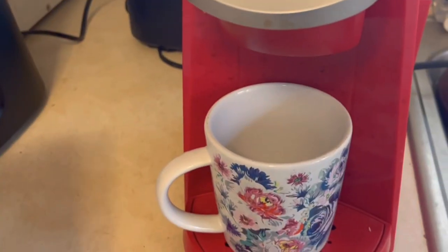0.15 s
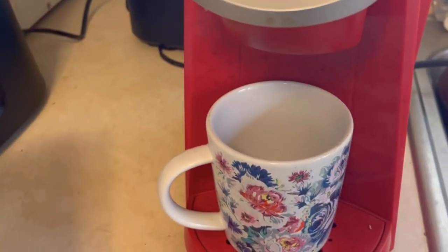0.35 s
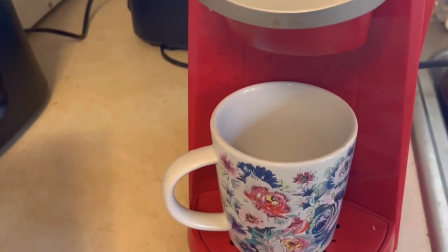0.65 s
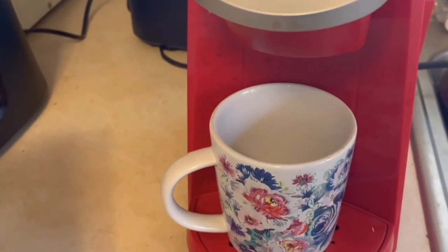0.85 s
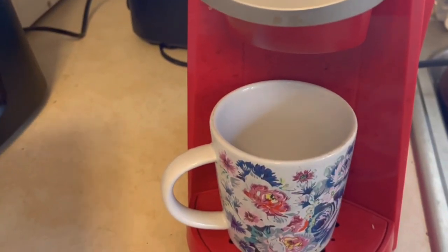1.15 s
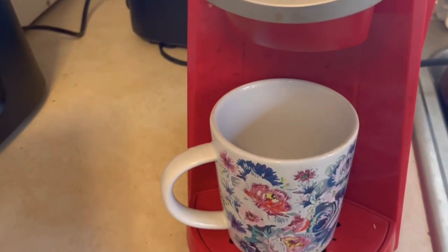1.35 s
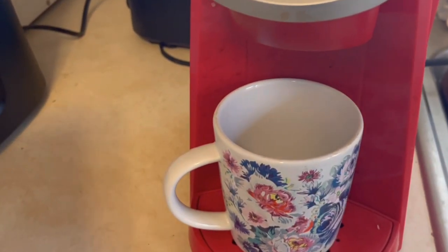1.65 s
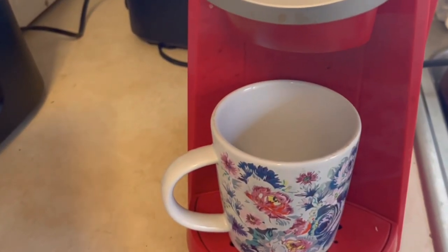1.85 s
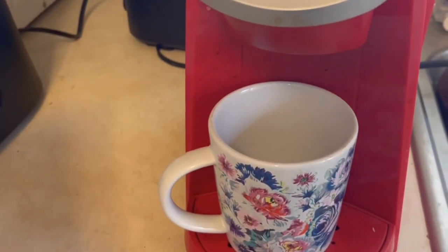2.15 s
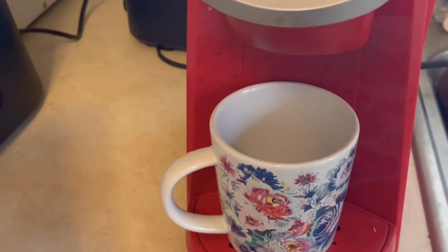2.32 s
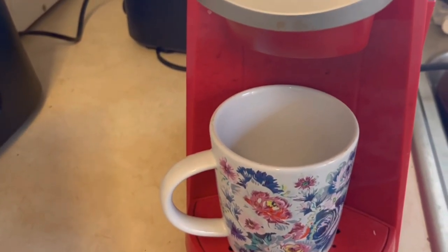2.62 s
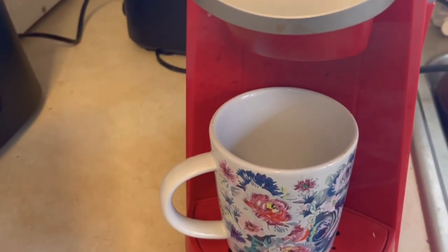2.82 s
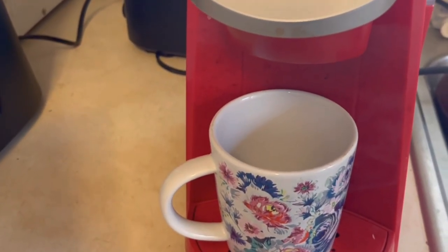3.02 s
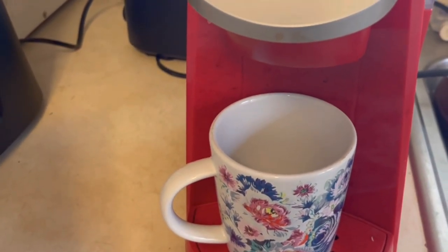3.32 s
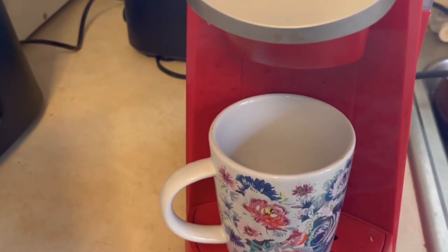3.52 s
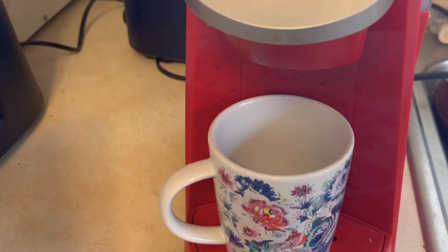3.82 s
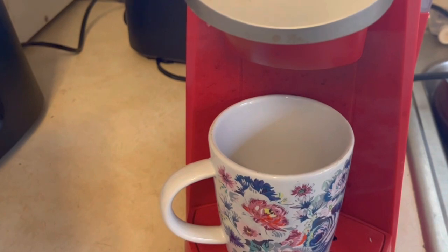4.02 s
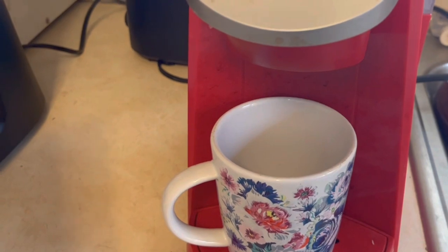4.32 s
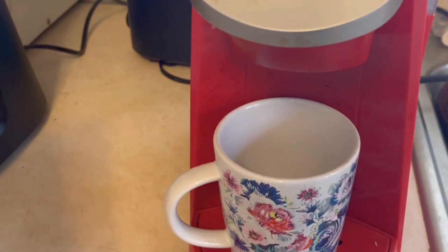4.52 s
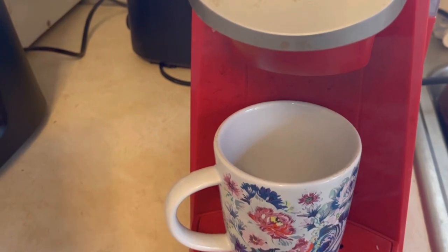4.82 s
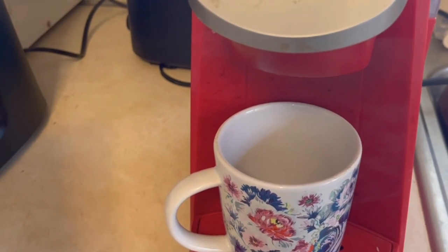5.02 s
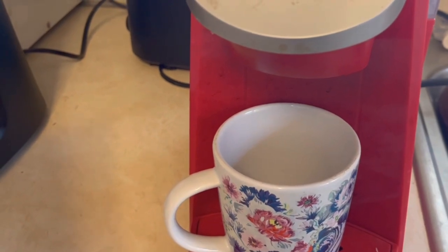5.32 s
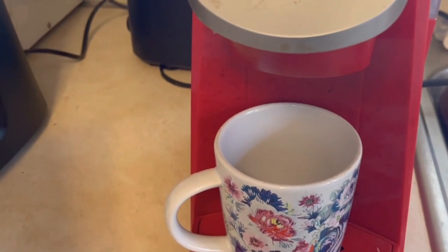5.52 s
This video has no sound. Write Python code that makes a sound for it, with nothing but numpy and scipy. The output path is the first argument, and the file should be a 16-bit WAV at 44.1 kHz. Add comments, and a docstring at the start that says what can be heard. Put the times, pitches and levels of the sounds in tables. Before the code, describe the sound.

A small coffee machine pump cycles slowly on a kitchen counter, each stroke a soft plastic rub, a tick, then a quick knock-and-snap.

```python
"""A low rumble, a faint rush and the rub of a stroke already under way are heard first.
The pump of a single-cup coffee machine cycles on a kitchen counter, a stroke about every 1.16 s:
the drive rubs in its plastic housing, a valve ticks open, the drive knocks at its stop, the valve snaps shut.
Contacts are sums of damped modes with noise bursts; rubbing and hisses are shaped noise.
Soft hisses and faint taps come between, and a small kitchen rings briefly as decaying diffuse noise."""
import sys
import numpy as np
from scipy import signal
from scipy.fft import rfft, irfft, next_fast_len
from scipy.io import wavfile
from scipy.ndimage import map_coordinates

SR = 44100
rng = np.random.default_rng(int(sys.argv[2]) if len(sys.argv) > 2 else 0)


def wav_out(sig):
    """Save sig, one row per channel (or a flat mono array), as 16-bit PCM at SR to the path in sys.argv[1]."""
    wavfile.write(sys.argv[1], SR, np.round(np.clip(np.atleast_2d(sig).T, -1, 1) * 32767).astype(np.int16))


N = 250047
TIME = np.arange(N) / SR
RING_TIME = np.arange(SR // 3) / SR

# Event levels are nominal: each component has its own trim.
# pump strokes: start_s (drive engages), contact_level_db, housing_shake_db, friction_db
STROKES = [(-0.035, -46, -57.5, -58), (1.1144, -48, -57.5, -59), (2.2653, -48.5, -59.5, -60),
           (3.4332, -48, -59.5, -61.5), (4.6066, -52.5, -60.5, -61.5)]
# the valve opens: start_s, level_db
OPENS = [(0.1397, -33.5), (1.289, -33.5), (2.445, -33), (3.6144, -32.5), (4.7933, -33)]
# the drive reaches its stop: start_s, level_db
KNOCKS = [(0.4226, -28), (1.5768, -28.5), (2.7372, -28.5), (3.9112, -28), (5.0921, -28)]
# the valve snaps shut: start_s, level_db
SNAPS = [(0.4631, -27.5), (1.6191, -27.5), (2.7812, -27), (3.954, -27), (5.1393, -28)]
# the drive catches lightly on its way: start_s, level_db, scuff_pitch_hz
CATCHES = [(0.2115, -37, 1160), (0.265, -40, 1240), (0.291, -38.5, 990), (1.3835, -38, 1150),
           (1.404, -41, 1240), (2.553, -44, 1300), (3.7215, -38, 1580), (4.9, -43, 1400)]
# soft hisses: centre_s, half_length_s (to 1/e), level_db
HISSES = [(0.299, 0.0083, -51), (0.331, 0.026, -51.5), (1.825, 0.087, -64.5), (1.939, 0.064, -61.5)]
# faint taps: start_s, pitch_hz, level_db, t60_s
TAPS = [(0.777, 70.4, -49, 0.13), (1.914, 280, -52.5, 0.11), (5.334, 1190, -54, 0.037),
        (5.398, 365, -41.5, 0.015)]

# modes of each contact, before damping and small random shifts: pitch_hz, base_width_hz, relative_db
START_MODES = [(1110, 140, -16), (1674, 66, 2), (2150, 40, 2.5), (2800, 180, -5), (3230, 79, -1.5)]
CATCH_MODES = [(901, 63, -6), (1135, 37, 3.5), (1297, 64, -0.5), (1533, 50, 1), (1723, 61, -2),
               (1980, 62, -11), (2330, 180, -25), (2880, 130, -12)]
OPEN_MODES = [(676, 9.7, -5), (1113, 22, -5), (1586, 21, 0), (1984, 65, -11), (2336, 19, -12),
              (2640, 38, -13), (3010, 25, -14), (3106, 130, -12.5), (3465, 26, -11.5), (3800, 50, -19),
              (3680, 6.7, -19.5), (4010, 94, -6.5)]
KNOCK_MODES = [(502, 44, -2), (1152, 42, -1.5), (1368, 30, -5.5), (2130, 70, -5.5), (2210, 18, -15),
               (2460, 50, -17.5), (2780, 19, -17), (2974, 25, -17), (3230, 110, -18), (4000, 25, -19.5),
               (5300, 16, -23.5)]
SNAP_MODES = [(1107, 17, -23), (1340, 11, -7.5), (1567, 24, -6), (1688, 22, -6.5), (2256, 39, 2),
              (2563, 15, -5), (2750, 22, -9), (2926, 160, -15), (4116, 70, -5), (4100, 170, -15.5),
              (5120, 35, -19)]
# noise-driven resonances of the housing and the drive: centre_hz, half_width_hz, relative_db
HOUSING = [(148, 53, -5.5), (194, 15, -0.5), (239.4, 13.3, 1.5), (302.6, 27, 3.5), (361, 11, -6.5),
           (436.3, 17.5, 1.5), (499, 27, -3), (559.4, 21.7, -1.5), (703.5, 27, -9)]
DRIVE = [(1146, 18, 7.5), (1487, 16, 3.5), (2150, 48, -21)]

# noise spectra of cracks, scraping, hisses, rumble and rush: frequency_hz, relative_db (density)
CRACK = [(240, -40), (400, -4), (886, -4.5), (1590, 7.5), (1990, -22), (2290, -33), (2510, -9), (3510, -11),
         (4090, -12), (4630, -17), (5910, -24.5), (10900, -28), (15500, -60)]
SCRAPE = [(300, -31), (500, -17.5), (650, -8), (980, -9.5), (1500, -4.5), (1850, -12), (2400, -12),
          (3000, -21), (4100, -24.5), (5000, -23), (6500, -30), (9600, -26.5), (11200, -28), (12500, -51),
          (15500, -31.5)]
HISS = [(150, -24), (400, 5.5), (1500, -0.5), (3200, -0.5), (4600, -5.5), (6500, -8), (9500, -11),
        (11500, -13), (13000, -27), (15500, -20)]
RUMBLE = [(12, -72), (20, -8.5), (70, 0), (117, -5.5), (170, -15.5), (235, -17), (265, -22.5), (304, -19),
          (348, -33), (500, -27), (650, -69.5), (1100, -120)]
RUSH = [(200, -10.5), (450, -6.5), (800, -7.5), (1150, -4.5), (1450, 2.5), (1700, 4), (1800, -12.5),
        (2400, -12.5), (3200, -19), (5500, -18.5), (6600, -27.5), (8300, -19), (11000, -34), (12500, -45)]

# left-right correlation of noise: frequency_hz, correlation (unitless)
ALIKE = [(60, 0.96), (250, 0.92), (500, 0.86), (1000, 0.22), (2000, 0.54), (4000, 0.33), (9000, 0.73)]
# reverberation time of the kitchen: frequency_hz, t60_s
KITCHEN = [(150, 0.67), (500, 0.51), (1400, 0.56), (2500, 0.52), (4000, 0.57), (10000, 0.29)]
# sound radiated towards the walls: frequency_hz, gain_db
WALLS = [(200, 0), (2600, 0), (3600, -1), (4100, -10), (4700, -4), (9000, -3)]
# stereo balance of the machine before the counter's ripple: frequency_hz, left_minus_right_db
LEAN = [(60, 0.3), (380, 0), (750, -2), (1600, -1.3), (2800, 1.3), (3600, 1.3), (4170, -3.5), (4900, 1),
        (8000, -0.3)]
# phase from the spacing of the microphones: frequency_hz, left_lead_rad
LEAD = [(400, -0.1), (1120, 0.4), (1450, -0.7), (4400, 0.5), (7000, -4.6), (8300, -6.2), (10200, -6.4),
        (15000, -12.6)]

# rubbing fades in as the drive engages, holds until the valve shuts, then dies away
RUN_UP_S, RUN_DOWN_S = 0.019, 0.051
# the effort jumps as the valve opens, then eases
LOAD_DB, EASE_S = 5, 0.15
# the effort swells again around the stop
STRAIN_DB, STRAIN_S = 4, 0.064
# dB that each part of the rubbing gains per dB of effort
HOUSING_GROWS, RATTLE_GROWS, SCRAPE_GROWS = 0.92, 1.15, 0.45
# the drive drags, then binds with a groan: seconds before the knock, dB against the knock
DRAG_S, DRAG_DB = 0.08, -21
BIND_S, BIND_DB = 0.037, -17
GROAN_DB, GROAN_DB_PER_STROKE = -19, 1.56  # the rise per stroke applies to binding and groan
# the valve rebounds once after opening: delay and trim
REBOUND_S, REBOUND_DB = 0.0067, -4.5
# a reflection off the counter ripples the stereo balance in the midrange
ECHO_S, RIPPLE_DB, RIPPLE_HZ, RIPPLE_WIDTH_HZ = 0.00146, 3, 1900, 1400
TOP_HZ = 15700


def amp(db):
    """Amplitude gain is ten to the power of decibels over twenty."""
    return 10 ** (np.asarray(db) / 20)


def unit(x):
    """Normalization divides a signal by its root mean square."""
    return x / np.sqrt(np.mean(x ** 2) + 1e-20)


def along(points, hz):
    """Interpolation on a logarithmic frequency axis joins tabulated values."""
    f, v = np.transpose(points)
    return np.interp(np.log(hz + 1), np.log(f + 1), v)


def wobble(rate):
    """Slow random modulation is a smooth curve through random knots, rate of them a second."""
    knots = rng.standard_normal(int(N * rate / SR) + 4)
    return map_coordinates(knots, [TIME * rate])


def filtered(x, response):
    """Linear filtering multiplies the spectrum by a frequency response."""
    n = x.shape[-1]
    m = next_fast_len(n + SR // 5)  # zero padding leaves room for filter tails
    hz = np.fft.rfftfreq(m, 1 / SR)
    return irfft(rfft(x, m) * response(hz), m)[..., :n]


def colour(points):
    """Spectral colouring follows a tabulated level curve."""
    return lambda hz: amp(along(points, hz))


def resonances(modes):
    """Independent resonances add in power; each has a Lorentzian amplitude."""
    def response(hz):
        peaks = [amp(db) / (1 + ((hz - centre) / width) ** 2) for centre, width, db in modes]
        return np.sqrt(sum(peak ** 2 for peak in peaks))
    return response


def noise(response, size):
    """Mixing independent mid and side noise sets the left-right correlation at each frequency."""
    def mid_side(hz):
        turn = np.arccos(np.clip(along(ALIKE, hz), -1, 1)) / 2
        return response(hz) * np.array([np.cos(turn), np.sin(turn)])
    mid, side = filtered(rng.standard_normal((2, size)), mid_side)
    return unit(np.array([mid + side, mid - side]))


def add(track, s, sound):
    """Superposition adds a sound at time s, trimmed to the track."""
    start = round(s * SR)
    track[:, max(start, 0):start + sound.shape[1]] += sound[:, max(-start, 0):N - start]


def fade(attack, t60):
    """A struck part's envelope rises quickly and decays exponentially."""
    return (1 - np.exp(-RING_TIME / attack)) * amp(-60 * RING_TIME / t60)


def contacts(events, modes, loss_hz, attack, crack_db, crack_t60, thump_db, thump_t60):
    """Impact excites damped modes, a broadband crack and a thump of the housing."""
    track = np.zeros((2, N))
    hz, width, db = np.transpose(modes)[:, :, None]
    width = np.maximum(width + loss_hz, 48)
    polarity = (-1) ** np.arange(len(modes))[:, None]  # neighbouring modes swing opposite ways
    # the factor of width holds each mode's spectral peak steady as damping changes
    decay = polarity * width * np.exp(-np.pi * width * RING_TIME) * (1 - np.exp(-RING_TIME / attack))
    # each mode has one left-right phase offset, the same for every event
    lead = rng.uniform(-0.39, 0.53, hz.shape)
    phase = np.array([lead, -lead])
    for s, level_db, *_ in events:
        strength = amp(db + rng.normal(0, 1, hz.shape))
        pitch = hz * (1 + rng.normal(0, 0.002, hz.shape))
        swing = np.sin(2 * np.pi * pitch * RING_TIME + phase)
        ring = np.sum(strength * decay * swing, axis=1)
        ring /= np.sqrt(np.mean(ring[:, :SR // 100] ** 2))  # rms 1 over the first 10 ms
        crack = amp(crack_db) * fade(attack, crack_t60) * noise(colour(CRACK), len(RING_TIME))
        thump = amp(thump_db) * fade(0.0074, thump_t60) * noise(resonances(HOUSING), len(RING_TIME))
        add(track, s, amp(level_db) * (ring + crack + thump))
    return track


def chatter(events, delay, db, attack, t60, modes):
    """Irregular contact is narrowband noise with a rough, decaying envelope."""
    track = np.zeros((2, N))
    for s, level_db in events:
        burst = fade(attack, t60) * noise(resonances(modes), len(RING_TIME))
        add(track, s + delay, amp(level_db + db) * burst)
    return track * unit(amp(1.5 * wobble(160)))


def background():
    """Filtered noise gives a wavering low rumble and a faint, nearly steady rush."""
    def low_band(hz):
        return colour(RUMBLE)(hz) * hz ** 4 / (hz ** 4 + 40 ** 4)
    rumble = amp(-65.0 + 1.66 * wobble(9)) * noise(low_band, N)
    rush = amp(-71.5 + 0.49 * wobble(5.7)) * noise(colour(RUSH), N)
    return rumble + rush


def drive_motion():
    """Load governs friction: returns shake and friction gains and effort in dB at each sample."""
    shake, friction, effort_db = np.zeros((3, N))
    for stroke, (opens, _), (stops, _), (shuts, _) in zip(STROKES, OPENS, KNOCKS, SNAPS):
        start, _, housing_db, friction_db = stroke
        run_up = np.maximum(start - TIME, 0) / RUN_UP_S
        run_down = np.maximum(TIME - shuts, 0) / RUN_DOWN_S
        moving = np.exp(-run_up - run_down)
        shake += moving * amp(housing_db)
        friction += moving * amp(friction_db)
        effort_db += LOAD_DB * (TIME > opens) * np.exp(-np.abs(TIME - opens) / EASE_S)
        effort_db += STRAIN_DB * np.exp(-((TIME - stops) / STRAIN_S) ** 2)
    return shake, friction, effort_db


def slips(rate, spread_db, t60):
    """Stick-slip releases energy in many small decaying events of random time and size."""
    chance, size = rng.random(N), rng.standard_normal(N)
    blows = (chance < rate / SR) * amp(spread_db * np.clip(size, -2, 2))
    power = signal.fftconvolve(blows ** 2, fade(0.00028, t60) ** 2)[:N]
    return unit(np.sqrt(np.abs(power)))


def rubbing():
    """Stick-slip friction shakes the housing and counter and rings the drive."""
    shake, friction, effort_db = drive_motion()
    housing = amp(0.5) * noise(resonances(HOUSING), N)
    counter = amp(-5.5) * noise(resonances([(64.8, 13, 1), (108.0, 15, -5.5)]), N)
    unevenness = unit(amp(1.4 * wobble(21) + 2.05 * wobble(130)))
    scrape = amp(-2.0) * unevenness * noise(colour(SCRAPE), N)
    rattle_noise = noise(resonances(DRIVE + [(810, 126, -6.5)]), N)
    rattle = amp(-3.5) * slips(rate=100, spread_db=3.5, t60=0.053) * rattle_noise
    grit_noise = noise(resonances([(1940, 570, 0.0), (2770, 590, -4.5), (4070, 560, -10.5)]), N)
    grit = amp(-6.5) * slips(rate=160, spread_db=2.0, t60=0.023) * grit_noise
    body = amp(HOUSING_GROWS * effort_db) * housing + counter
    surface = amp(RATTLE_GROWS * effort_db) * rattle + amp(SCRAPE_GROWS * effort_db) * (scrape + grit)
    return shake * body + friction * surface


def drive_contacts():
    """Impacts and friction ring the drive as it engages, catches, drags, binds and hits its stop."""
    start = amp(-8.5) * contacts(STROKES, START_MODES, loss_hz=9, attack=0.001,
                                 crack_db=2.0, crack_t60=0.11, thump_db=6, thump_t60=0.15)
    catches = amp(-11.5) * contacts(CATCHES, CATCH_MODES, loss_hz=-16, attack=0.001,
                                    crack_db=-2, crack_t60=0.1, thump_db=0, thump_t60=0.09)
    for s, level_db, hz in CATCHES:  # each catch scuffs at its own pitch
        scuff = fade(0.0018, 0.057) * noise(resonances([(hz, 130, 0)]), len(RING_TIME))
        add(catches, s, amp(level_db - 4.5) * scuff)
    drag = chatter(KNOCKS, delay=-DRAG_S, db=DRAG_DB, attack=0.02, t60=0.24,
                   modes=[(1160, 38, 2), (1500, 120, -10)])
    building = [(s, level_db + GROAN_DB_PER_STROKE * k) for k, (s, level_db) in enumerate(KNOCKS)]
    bind = chatter(building, delay=-BIND_S, db=BIND_DB, attack=0.0018, t60=0.057,
                   modes=[(515, 90, -4), (1166, 63, 0.5), (1530, 130, -0.5), (2400, 500, -17)])
    groan = chatter(building, delay=-BIND_S, db=GROAN_DB, attack=0.0046, t60=0.21,
                    modes=[(155, 18, -3), (197, 20, 0), (245, 17, -0.5), (305, 24, 0), (470, 60, -4)])
    knock = amp(-14) * contacts(KNOCKS, KNOCK_MODES, loss_hz=1.5, attack=0.00084,
                                crack_db=-1.5, crack_t60=0.07, thump_db=3.5, thump_t60=0.12)
    rattle = chatter(KNOCKS, delay=0.00701, db=-7, attack=0.00038, t60=0.034,
                     modes=[(510, 120, -1.6), (1130, 61, -1.1), (1460, 390, -1.1)])
    return start + catches + drag + bind + groan + knock + rattle


def valve_opening():
    """Release of a seated valve gives a creak, an unsticking, a modal tick and a rebound."""
    creak = chatter(OPENS, delay=-0.032, db=-21, attack=0.0022, t60=0.07,
                    modes=[(1200, 200, 1), (2360, 400, -6)])
    unstick = chatter(OPENS, delay=-0.0075, db=-6.5, attack=0.00078, t60=0.057,
                      modes=[(1360, 610, 16), (3220, 230, -13)])
    tick = amp(-6.5) * contacts(OPENS, OPEN_MODES, loss_hz=7.3, attack=0.0012,
                                crack_db=-2.5, crack_t60=0.083, thump_db=-1.5, thump_t60=0.18)
    rebound = chatter(OPENS, delay=REBOUND_S, db=REBOUND_DB, attack=0.00049, t60=0.023,
                      modes=[(1420, 410, -1.5), (3200, 420, -6.5), (4120, 160, -1)])
    return creak + unstick + tick + rebound


def hisses():
    """Broadband noise swells in Gaussian envelopes with slight crackle."""
    level = sum(amp(db) * np.exp(-((TIME - s) / half) ** 2) for s, half, db in HISSES)
    crackle = unit(amp(1.5 * wobble(300) + 1.2 * wobble(40)))
    return level * crackle * noise(colour(HISS), N)


def valve_closing():
    """Impact on the valve seat gives a brush, a modal snap, a crunch and a brief buzz."""
    brush = chatter(SNAPS, delay=-0.004446, db=-8, attack=0.00048, t60=0.036, modes=[(1513, 250, 0)])
    snap = amp(-10.5) * contacts(SNAPS, SNAP_MODES, loss_hz=13, attack=0.00064,
                                 crack_db=1.0, crack_t60=0.068, thump_db=-1.5, thump_t60=0.17)
    crunch = chatter(SNAPS, delay=0, db=-10.5, attack=0.00045, t60=0.024,
                     modes=[(2900, 410, 4.5), (3900, 230, 6), (8900, 5800, -24)])
    buzz = chatter(SNAPS, delay=0.005, db=-26.0, attack=0.0019, t60=0.45,
                   modes=[(1400, 75, -7), (2310, 95, 1), (2500, 73, 0), (2820, 170, -16),
                          (3730, 150, -14), (4130, 200, -12), (5150, 80, -18)])
    return brush + snap + crunch + buzz


def taps():
    """A single damped sine mode gives each soft tap."""
    track = np.zeros((2, N))
    for s, hz, db, t60 in TAPS:
        tap = fade(0.0016, t60)[None] * np.sin(2 * np.pi * hz * RING_TIME)
        add(track, s, amp(db) * tap)
    return track


def kitchen(x):
    """Diffuse reverberation is convolution with noise whose decay time depends on frequency."""
    hz, t, z = signal.stft(noise(np.ones_like, SR // 2 + SR // 5), SR, nperseg=256)
    decay = amp(-60 * t / along(KITCHEN, hz)[:, None])
    build_up = 1 - np.exp(-t / 0.0016)
    tail = signal.istft(z * decay * build_up, SR, nperseg=256)[1]
    tail /= np.linalg.norm(tail[0])
    return signal.fftconvolve(x.mean(axis=0)[None], tail, axes=1)[:, :N]


def balance(hz):
    """Interference with a delayed reflection ripples the left-minus-right level, in dB."""
    depth_db = RIPPLE_DB * np.exp(-((hz - RIPPLE_HZ) / RIPPLE_WIDTH_HZ) ** 2)
    return along(LEAN, hz) + depth_db * np.cos(2 * np.pi * hz * ECHO_S)


def scene():
    """Direct and reverberant sound superpose, with level and phase differences between the sides."""
    rub, drive = rubbing(), drive_contacts()
    opening, closing = valve_opening(), valve_closing()
    room = kitchen(amp(-6.5) * opening + amp(-8.5) * closing + amp(-9.5) * drive + amp(-9) * rub)
    machine = opening + closing + drive + rub + hisses() + filtered(room, colour(WALLS))
    sides = np.array([[0.5], [-0.5]])  # half of each difference goes to either side

    def stereo(hz):
        return amp(sides * balance(hz)) * np.exp(1j * sides * along(LEAD, hz))
    return filtered(machine, stereo) + taps() + background()


def record(dry):
    """Band limitation removes every component at or above the top frequency."""
    return filtered(dry, lambda hz: hz < TOP_HZ)


dry = scene()
out = record(dry)
wav_out(out)
```